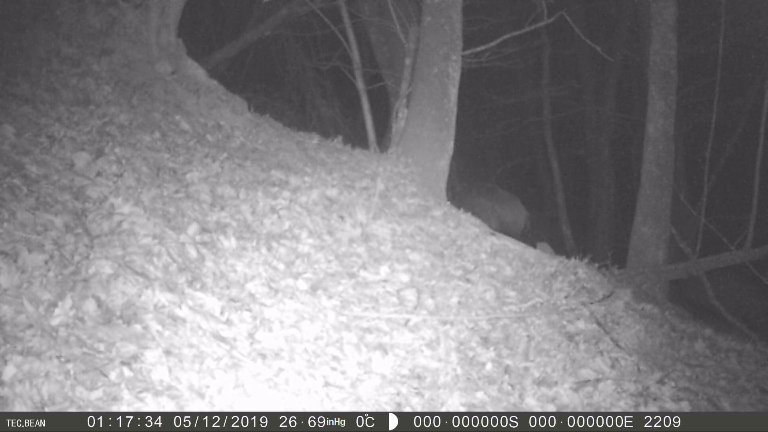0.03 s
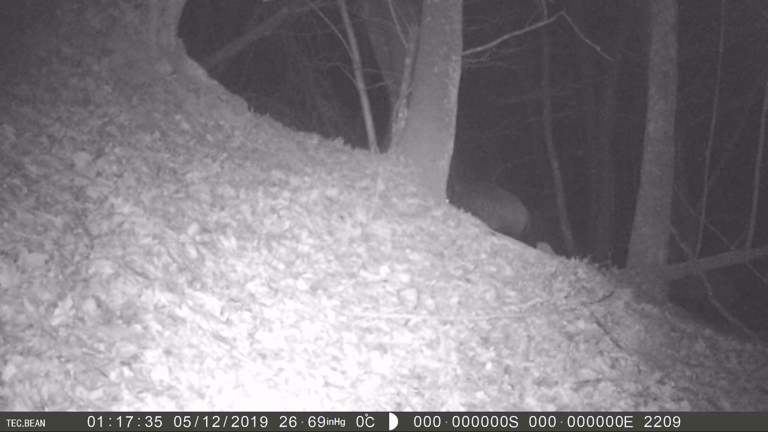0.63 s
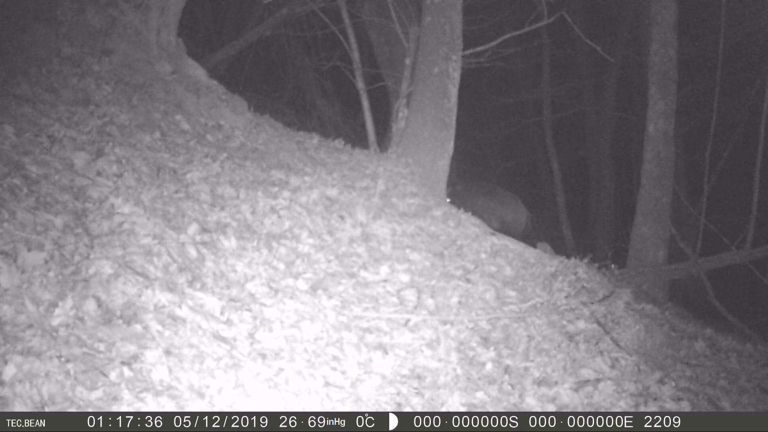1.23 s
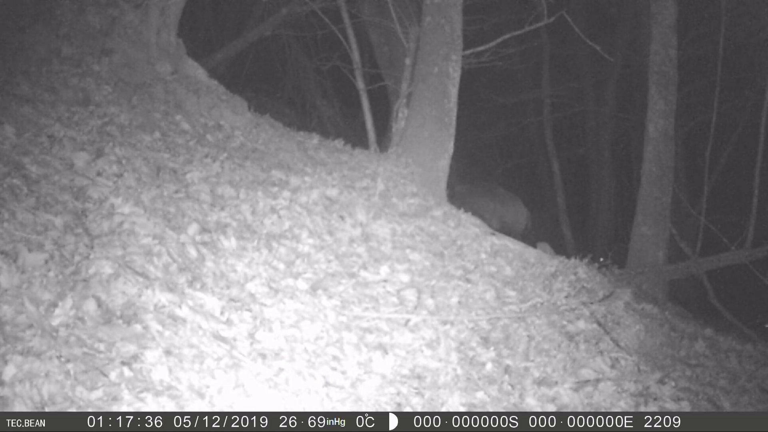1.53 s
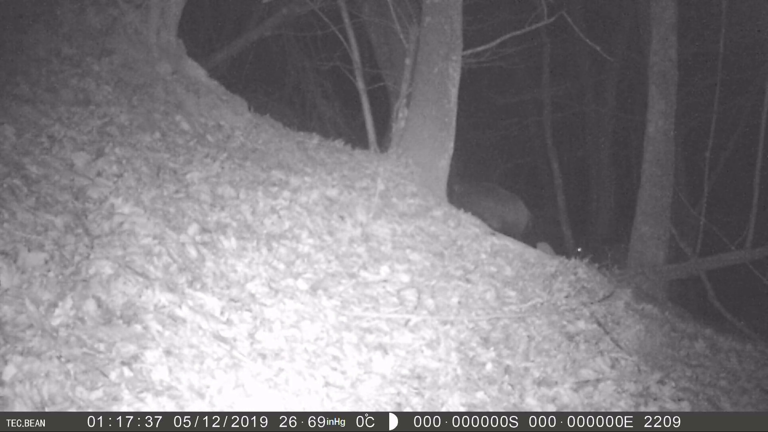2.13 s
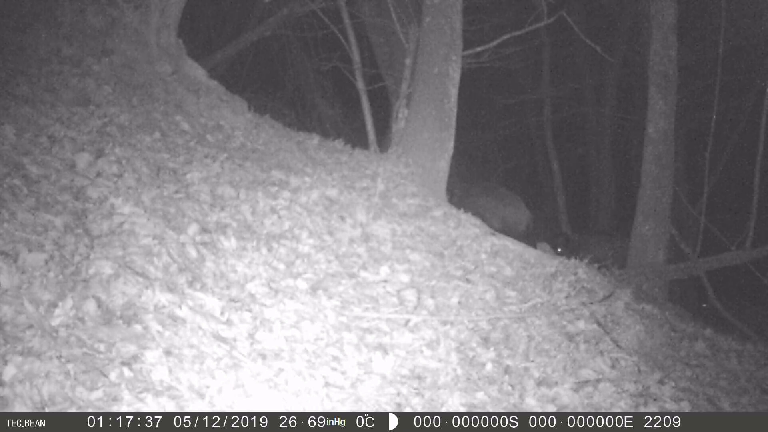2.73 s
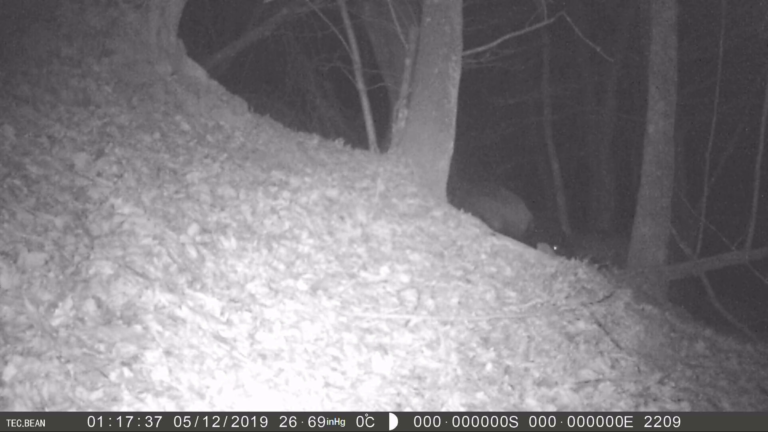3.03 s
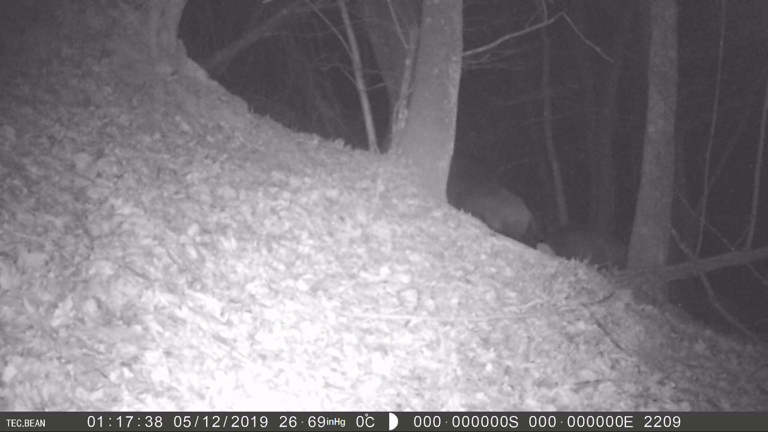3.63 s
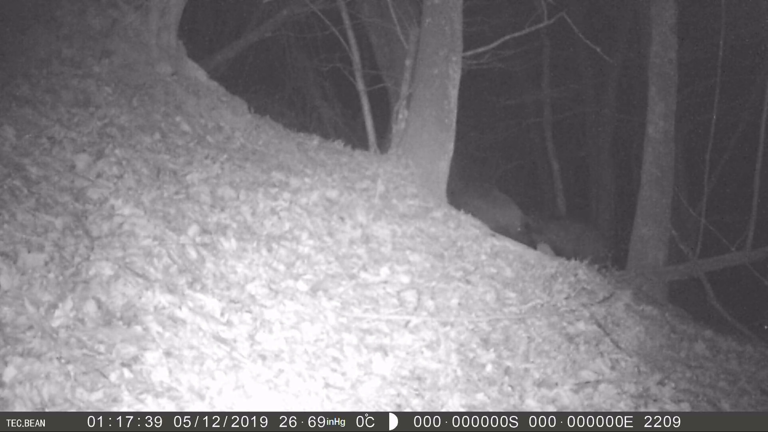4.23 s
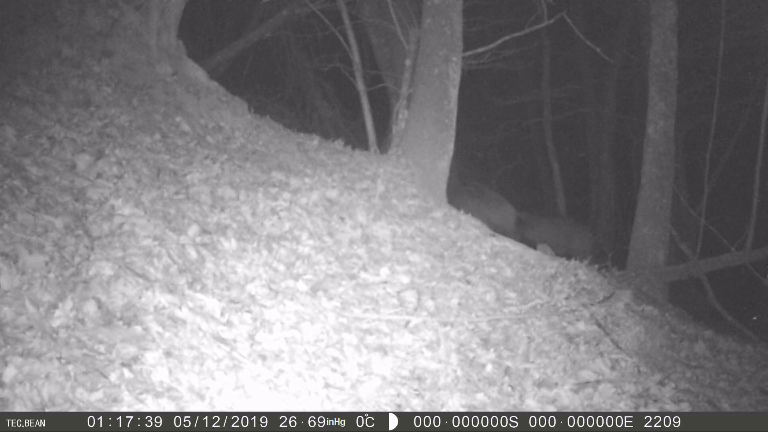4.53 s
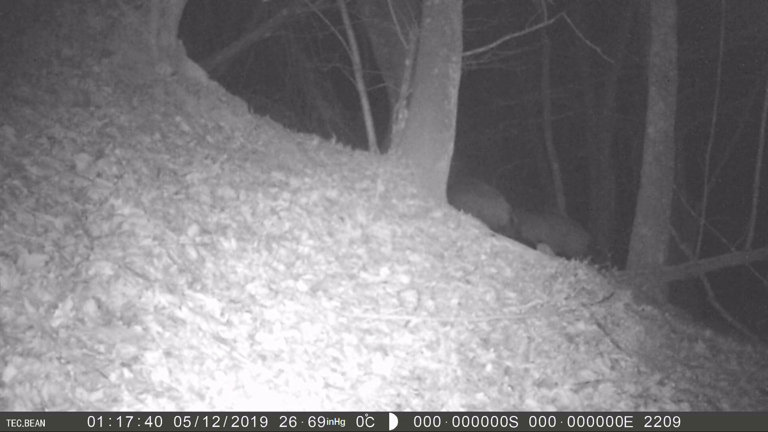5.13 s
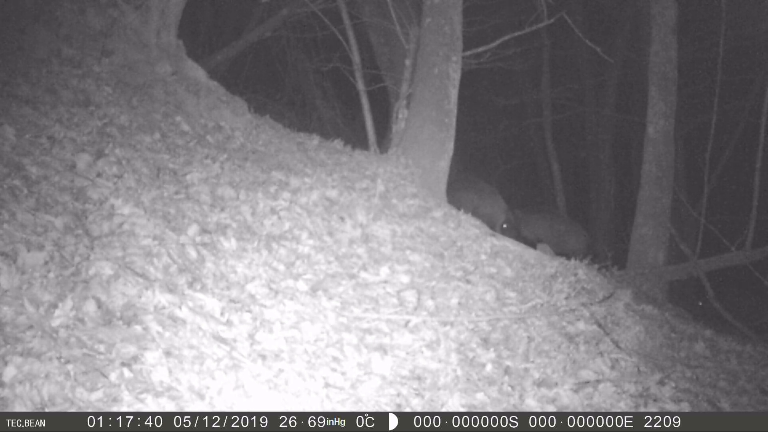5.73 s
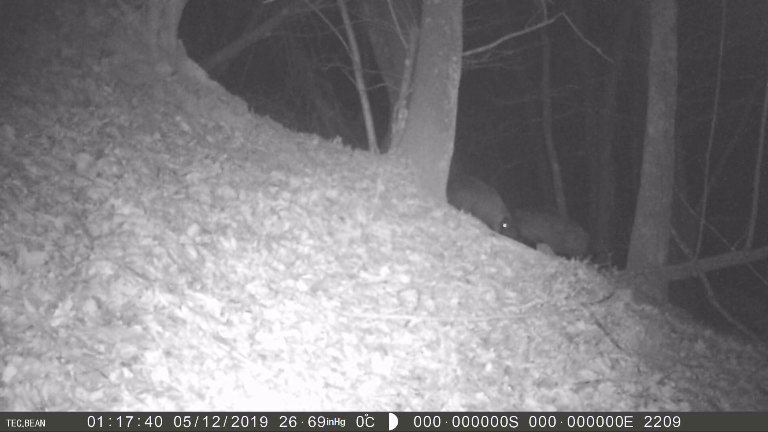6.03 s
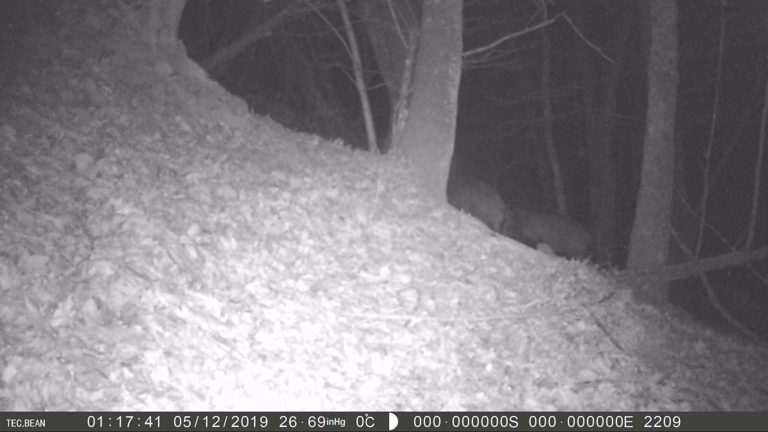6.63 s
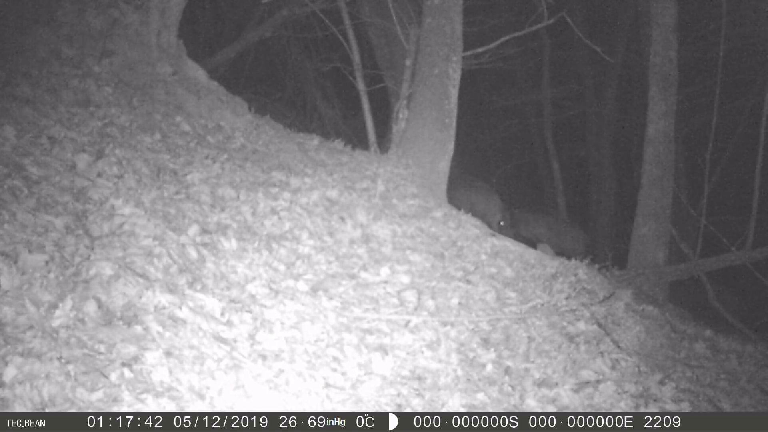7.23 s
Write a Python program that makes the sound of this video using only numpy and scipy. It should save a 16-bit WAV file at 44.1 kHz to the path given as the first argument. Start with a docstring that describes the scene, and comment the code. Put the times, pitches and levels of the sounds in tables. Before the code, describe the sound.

Hoofed animals forage through dry leaves on a wooded slope at night. Irregular, muffled scuffs and rustles come in quick bursts, mixed with dull cracks, small ticks and soft hoof thumps. About halfway through, the steps turn quieter and sparser, then pick up slightly. The small microphone adds a low rumble, steady faint hiss and a thin, high sizzle on the rustling.

```python
"""Animals foraging at night

On a wooded slope, animals step through leaf litter near a small camera strapped to a tree.
The housing acts as a low-pass filter: scuffs arrive as thud, rush and flutter over a low rumble,
with muffled cracks and soft hoof thumps. Leaf bits tick and dry leaves crackle faintly.
The camera adds amplifier hiss, and its sample-and-hold mirrors the rustle into a sizzle near 11 kHz."""
import sys
import numpy as np
from scipy import signal
from scipy.fft import rfft, irfft
from scipy.io import wavfile
from scipy.ndimage import uniform_filter1d

SR = 44100
rng = np.random.default_rng(int(sys.argv[2]) if len(sys.argv) > 2 else 0)


def wav_out(sig):
    """Save sig, one row per channel (or a flat mono array), as 16-bit PCM at SR to the path in sys.argv[1]."""
    wavfile.write(sys.argv[1], SR, np.round(np.clip(np.atleast_2d(sig).T, -1, 1) * 32767).astype(np.int16))


N = 330750
TIME = np.arange(N) / SR
FREQS = np.maximum(np.fft.rfftfreq(N, 1 / SR), 1)


def undb(db):
    """The decibel scale: amplitude grows tenfold every 20 dB."""
    return 10 ** (np.asarray(db) / 20)


def curve(rows):
    """Linear interpolation in time between rows of (t/s, value)."""
    return np.interp(TIME, *np.transpose(rows))


def colour(x, points):
    """Spectral shaping by points of (f/Hz, gain/dB), joined on a logarithmic frequency axis."""
    hz, db = np.transpose(points)
    return irfft(rfft(x) * undb(np.interp(np.log(FREQS), np.log(hz), db)), N)


def band(x, lo_hz, hi_hz):
    """Ideal band-pass filter: only the part between two frequencies remains."""
    return irfft(rfft(x) * ((FREQS > lo_hz) & (FREQS < hi_hz)), N)


def crossover(lo_hz, hi_hz):
    """Crossover gain, rising from 0 to 1 with the logarithm of frequency."""
    return np.clip(np.log(FREQS / lo_hz) / np.log(hi_hz / lo_hz), 0, 1)


def wander(cutoff_hz):
    """Random modulation: band-limited Gaussian noise of unit variance."""
    spectrum = rfft(rng.standard_normal(N)) * np.exp(-(FREQS / cutoff_hz) ** 2)
    x = irfft(spectrum * FREQS / (FREQS + cutoff_hz / 10), N)
    return x / x.std()


# Steps and scuffs in the litter: t/s, duration/s, level/dB, lightness/dB (below 0: heavy and dull)
SCUFF_STEPS = [(-0.003, 0.12, -28, 0.5), (0.146, 0.22, -34, -0.5), (0.488, 0.009, -35, -1.0),
               (0.575, 0.066, -24.5, 1.5), (0.704, 0.19, -29, 0.5), (0.924, 0.087, -31.5, 1),
               (1.104, 0.17, -32.0, 1.0), (1.261, 0.043, -21.5, 0.0), (1.394, 0.01, -29, 0.0),
               (1.468, 0.057, -27.5, -0.5), (1.59, 0.012, -25, 0.5), (1.646, 0.039, -27.5, -0.5),
               (1.752, 0.12, -31.5, 1.5), (2.001, 0.018, -27.5, 0.0), (2.059, 0.084, -32.5, -0.5),
               (2.229, 0.0024, -27, -0.5), (2.296, 0.117, -29, 1.0), (2.428, 0.067, -20.5, 1),
               (2.528, 0.194, -31, 1.0), (2.723, 0.14, -26.5, 0), (2.921, 0.1, -29.5, 1.5),
               (3.104, 0.11, -32.5, 0.0), (3.352, 0.059, -39.5, 0.5), (3.51, 0.21, -31.5, -1.5),
               (3.631, 0.05, -27, 0.5), (3.683, 0.073, -35, 0), (3.948, 0.022, -42, 2.0),
               (4.027, 0.077, -33.5, -1.0), (4.173, 0.1, -42, 0), (4.365, 0.01, -29.5, -1.5),
               (4.444, 0.0036, -32.5, -0.5), (4.534, 0.15, -43, 0.5), (4.747, 0.022, -37.5, 0.0),
               (4.838, 0.018, -51, 1), (5.028, 0.095, -44, -0.5), (5.301, 0.0025, -40, -3),
               (5.404, 0.13, -35.0, -0.5), (5.624, 0.078, -31.5, 0), (5.774, 0.081, -35.5, 1.5),
               (5.878, 0.084, -34.5, 0.0), (6.017, 0.16, -37.5, 0), (6.2, 0.079, -33, -0.5),
               (6.328, 0.14, -43, 0.5), (6.525, 0.08, -39.0, 2), (6.626, 0.041, -33.5, 2),
               (6.743, 0.1, -36, -0.5), (6.892, 0.074, -32.5, -0.5), (7.027, 0.25, -41, 0.5),
               (7.397, 0.021, -36.5, 3.0), (7.45, 0.0088, -27.5, -2)]


def scuff_envelope(attack_s=0.021, release_s=0.026, usual_length_s=0.064, idle_db=-60.5):
    """Incoherent sources add in power: gives the scuffs' total level and power-weighted lightness."""
    t = TIME[::40]
    power, weighted_lightness = undb(idle_db) ** 2, 0
    for start, length, db, lightness in SCUFF_STEPS:
        # the leaves yield and settle exponentially, faster in a short scuff
        edge_scale = (abs(length) / usual_length_s) ** 0.2
        falloff = np.maximum(start - t, 0) / attack_s + np.maximum(t - start - length, 0) / release_s
        scuff_power = (undb(db) * np.exp(-falloff / edge_scale)) ** 2
        power += scuff_power
        weighted_lightness += scuff_power * lightness
    return np.interp(TIME, t, 10 * np.log10(power)), np.interp(TIME, t, weighted_lightness / power)


# Spectral shape of the muffled rustle: f/Hz, relative level/dB
RUSTLE_SPECTRUM = [(10, -3), (25, -10), (55, -3), (90, 1), (125, 5.5), (160, -4), (230, -8.5), (400, -12.5),
                   (700, -24.5), (1000, -27.5), (1450, -34), (1950, -41), (2200, -47), (4000, -69.5)]


def churn(stir, flutter_db, lo_hz, hi_hz):
    """Amplitude modulation bunches the energy; dividing by the band's running RMS steadies its level."""
    x = colour(stir * undb(flutter_db), RUSTLE_SPECTRUM)
    power = band(x, lo_hz, hi_hz) ** 2
    power = uniform_filter1d(uniform_filter1d(power, size=2200), size=1500)
    return band(x, lo_hz / 2, hi_hz * 3) / np.sqrt(power + 0.097 * power.mean())


# Envelope of the deep rumble: t/s, base level/dB
RUMBLE_LEVEL = [(0.0, -38), (0.46, -38.5), (0.6, -26), (0.65, -33.5), (1.48, -37.5), (1.54, -25),
                (1.86, -46), (1.98, -34.5), (2.42, -36), (2.44, -25), (2.55, -33.5), (3.53, -38.5),
                (3.7, -22.5), (3.76, -40.5), (7.23, -37), (7.35, -45), (7.48, -26), (7.5, -32)]


def rustle(effort_db, lightness, kicks_per_s=700, usual_db=-30):
    """Shot noise plus Gaussian noise drives four bands; the higher the band, the briefer its packets."""
    kicks = rng.standard_normal(N) * (rng.random(N) < kicks_per_s / SR)
    stir = kicks / kicks.std() + 0.86 * rng.standard_normal(N)
    packets, grain = wander(70), wander(220)
    push_db = effort_db - usual_db + 1.57 * wander(24.4)  # the leaves give way in clumps
    # the bass follows the push only in part, and light scuffs have less thud
    rumble = churn(stir, 1.6 * wander(28), 17, 60)
    rumble *= undb(curve(RUMBLE_LEVEL) + 1.5 + 0.11 * push_db + 2.7 * wander(6.1))
    thud = churn(stir, 2.4 * packets, 76, 180)
    thud *= undb(-24.5 + 0.61 * push_db - 1.96 * lightness + 1.84 * wander(14))
    rush = churn(stir, 1.85 * packets + grain, 284.5, 820)
    rush *= undb(-31 + 0.98 * push_db)
    flutter = churn(stir, 2.73 * packets + 2 * grain + 0.99 * wander(61), 815, 3000)
    flutter *= undb(-45 + 1.065 * push_db + 0.76 * lightness)
    low, middle, high = crossover(24, 104), crossover(100, 307), crossover(570, 1080)
    scuffs = rfft(thud) * (1 - middle) + rfft(rush) * middle * (1 - high) + rfft(flutter) * high
    return irfft(rfft(rumble) * (1 - low) + scuffs * low, N)


# The loudest cracks underfoot: t/s, level/dB before muffling, half width/s
LOUD_CRACKS = [(0.029, -8, .0012), (0.55, -11, .0005), (0.633, -9, 0.00085), (0.726, -14, 0.00022),
               (0.761, -1, 0.00043), (0.93, -5.5, 0.00042), (1.155, -6, 0.00036), (1.26, -3.5, 0.00091),
               (1.28, -10, 0.00024), (1.472, -8, 0.00061), (1.512, 0.5, 0.0006), (1.586, 2.5, 0.00062),
               (1.648, -9, .0008), (1.686, -2.5, 0.00061), (1.846, -3, 0.00076), (2.001, -1.5, 0.0006),
               (2.057, -6, 0.00072), (2.226, -4, 0.00063), (2.426, 7.5, 0.00079), (2.435, 0, .00055),
               (2.468, -0.5, 0.00028), (2.492, 4, 0.00028), (2.849, 1, 0.00071), (2.887, -4, 0.00086),
               (2.938, -7, .0005), (3.507, -3, 0.00086), (3.61, -2.5, .00047), (3.63, -1, 0.00031),
               (3.654, 3.5, 0.00048), (4.067, -9, 0.00057), (4.188, -11.5, 0.00048), (4.287, -13, 0.00046),
               (4.388, 0.5, 0.0012), (4.451, -13, 0.00021), (4.767, -22, 0.00021), (4.864, -20.5, .00047),
               (5.297, -17, 0.00058), (5.46, -6, 0.0009), (5.835, -2, 0.00087), (6.002, -21, .00036),
               (6.214, -9, 0.00045), (6.657, -2.5, 0.0014), (6.945, -7, .0005), (7.456, 0, 0.00051)]


def cracks(effort_db, lesser_per_s=7, lesser_width_s=0.00041):
    """Each crack is a muffled pressure pulse; bandwidth varies inversely with width: narrow is bright."""
    pulses = list(LOUD_CRACKS)
    # lesser cracks fall at random and follow the level of the scuffs
    for when, size, shape in rng.random((int(lesser_per_s * N / SR), 3)):
        db = effort_db[int(when * N)] + 15.5 + (2 * size - 1)
        pulses.append((when * N / SR, db, lesser_width_s * 2 ** (shape - 0.5)))
    out = np.zeros(N)
    for (centre, db, width), turn in zip(pulses, rng.random(len(pulses))):
        near = abs(TIME - centre) < 0.1
        lorentzian = 1 / (1 - 1j * (TIME[near] - centre) / max(width, 1 / SR))
        # the phase sets the shape, between a single peak and a two-sided swing
        out[near] += undb(db) * np.real(np.exp(2j * np.pi * turn) * lorentzian)
    muffling = [(20, -29), (80, -10.5), (200, -7.5), (450, -5.5), (1900, -6.5), (2400, -28), (5000, -22)]
    return colour(out, muffling)


# Ticks and crunches, as of leaf bits on the housing: t/s, level/dB before shaping, decay/s, cutoff f/Hz
LEAF_TICKS = [(.410, -45, 0.0017, 5400), (0.576, -35.5, 0.0026, 2980), (0.927, -30.5, 0.0044, 1090),
              (1.228, -39, .001, 4500), (2.43, -27.5, 0.0077, 2080), (2.467, -27, 0.00075, 4500),
              (2.491, -21, 0.00085, 4480), (2.845, -42, 0.0015, 2200), (3.651, -38, 0.0012, 4000),
              (3.959, -47, 0.003, 1290), (4.058, -37, 0.0023, 1200), (4.395, -45, .001, 4000),
              (5.107, -44, .002, 1490), (5.919, -43, 0.0016, 1990), (6.013, -36, 0.002, 1290)]


def ticks():
    """Damped transients: low-passed noise bursts that decay exponentially within milliseconds."""
    out = np.zeros(N)
    for start, db, decay, cutoff_hz in LEAF_TICKS:
        snap = rng.standard_normal(N) * (TIME >= start) * np.exp(-abs(TIME - start) / decay)
        snap = signal.sosfilt(signal.butter(4, cutoff_hz, fs=SR, output="sos"), snap + 1e-18)
        out += undb(db) * snap / abs(snap).max()
    return colour(out, [(200, -1), (900, 3), (2000, 8), (3200, 0.5), (5000, -8.5)])


# Envelope of the leaf litter's fine crackle: t/s, level/dB
CRACKLE_LEVEL = [(.45, -75), (.9, -60.5), (2.75, -65), (3.9, -66), (5.65, -63.5), (7.5, -91)]


def leaf_crackle(clicks_per_s=1500):
    """A Poisson process: dry leaves crack in tiny independent clicks of random size."""
    clicks = rng.standard_normal(N) * (rng.random(N) < clicks_per_s / SR)
    clicks *= undb(1.6 * wander(20))
    crackle = colour(clicks, [(400, -16), (1200, 5), (2600, 1), (3800, -1.5), (5200, -8)])
    return crackle / crackle.std() * undb(curve(CRACKLE_LEVEL))


# Hooves landing on soft ground: t/s, peak level/dB
HOOF_FALLS = [(0.828, -15), (1.284, -17), (1.6, -12), (2.226, -14), (2.43, -14.5), (3.645, -15),
              (4.111, -21), (5.831, -16.5), (6.945, -15.5), (7.197, -18)]


def hoof_thumps(pitch_hz=102, pitch_spread=0.25, half_length_s=0.0096):
    """A soft impact excites only low frequencies: a couple of cycles under a Gaussian envelope."""
    out = np.zeros(N)
    for (centre, db), (detune, turn) in zip(HOOF_FALLS, rng.random((len(HOOF_FALLS), 2))):
        near = abs(TIME - centre) < 0.1
        t = TIME[near] - centre
        hz = pitch_hz * (1 + pitch_spread * (2 * detune - 1))
        envelope = undb(db) * np.exp(-(t / half_length_s) ** 2)
        out[near] += envelope * np.cos(2 * np.pi * (hz * t + turn))
    return out


def scene():
    """Superposition: the pressures of all sources add at the microphone."""
    effort_db, lightness = scuff_envelope()
    litter = rustle(effort_db, lightness) + leaf_crackle() + ticks()
    return (litter + cracks(effort_db) + hoof_thumps())[None]


# Spectral shape of the amplifier's hiss: f/Hz, relative level/dB
HISS_SPECTRUM = [(100, 11.5), (500, 4.5), (1200, 4.5), (1600, -4.5), (2900, 0), (3400, -2.5), (3800, -1.5),
                 (4050, -7), (4400, -3), (4700, -1.5), (5100, -4.5), (5500, -12.5)]
# Envelope of the hiss, sinking slightly: t/s, level/dB
HISS_LEVEL = [(0, -55.5), (1, -58.5), (6.5, -58.5), (7.5, -59)]


def amplifier_hiss(nyquist_hz):
    """The amplifier's noise floor: coloured Gaussian noise, its level set below the Nyquist limit."""
    hiss = colour(rng.standard_normal(N), HISS_SPECTRUM)
    return undb(curve(HISS_LEVEL)) * hiss / band(hiss, 0, nyquist_hz).std()


def record(dry, hold_samples=4, cutoff_hz=15600):
    """Zero-order hold: the converter's stair steps mirror the spectrum about its sampling rate."""
    nyquist_hz = SR / hold_samples / 2
    x = dry[0] + amplifier_hiss(nyquist_hz)
    x = 0.93 * np.tanh(x / 0.83)  # soft saturation
    x *= np.clip(np.minimum(TIME, TIME[::-1]) / 0.003, 0, 1)  # 3 ms fades
    x = band(x, 0, nyquist_hz)
    x = np.repeat(x[::hold_samples], hold_samples)[:N]
    x = colour(x, [(8000, 0.14), (10500, 0), (12500, 0), (15000, 0.5)])
    low_pass = signal.ellip(10, 0.1, 80, cutoff_hz, fs=SR, output="sos")
    return signal.sosfilt(low_pass, x)[None]


dry = scene()
out = record(dry)
wav_out(out)
```